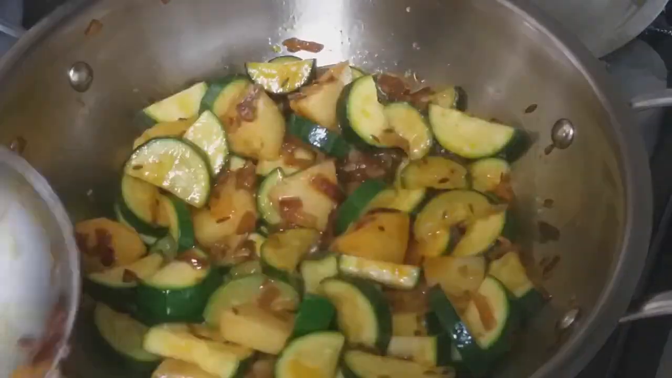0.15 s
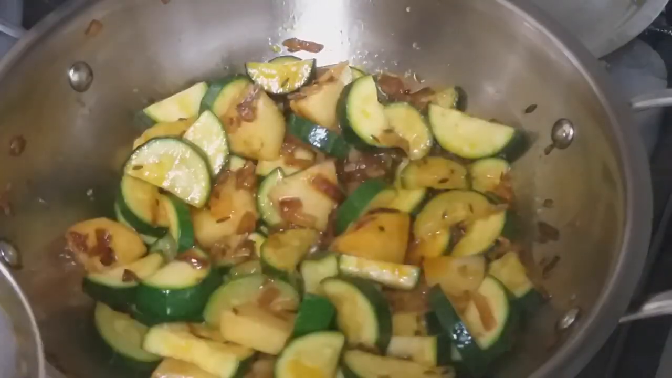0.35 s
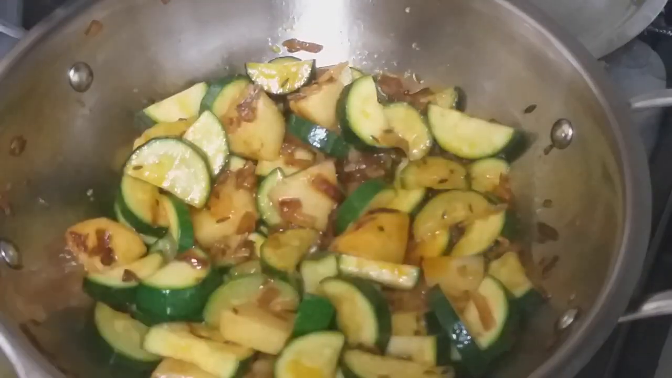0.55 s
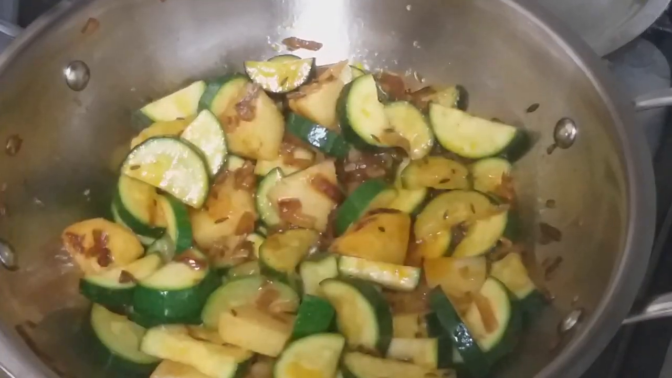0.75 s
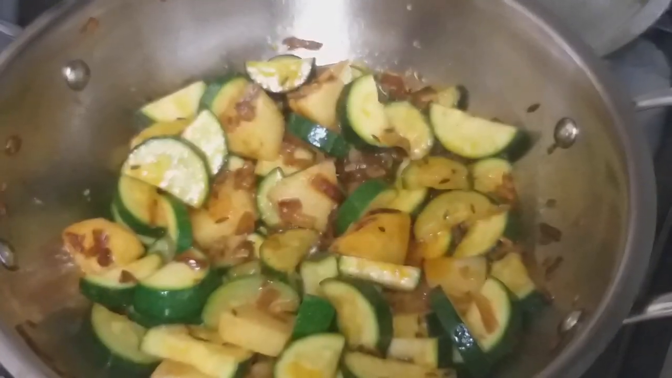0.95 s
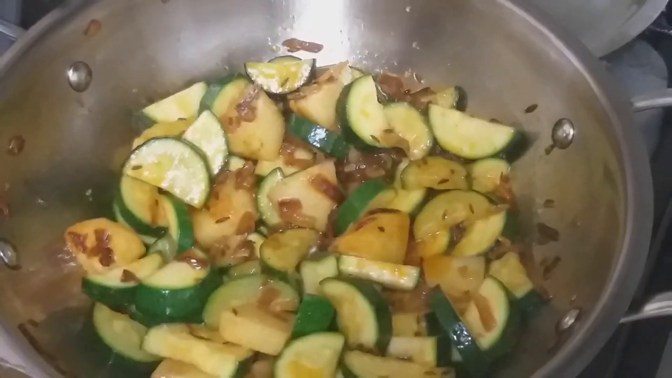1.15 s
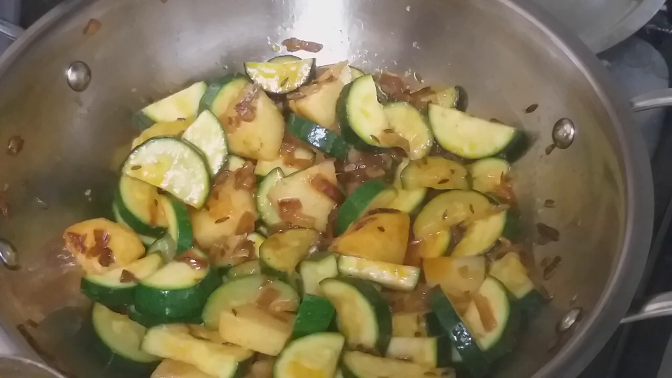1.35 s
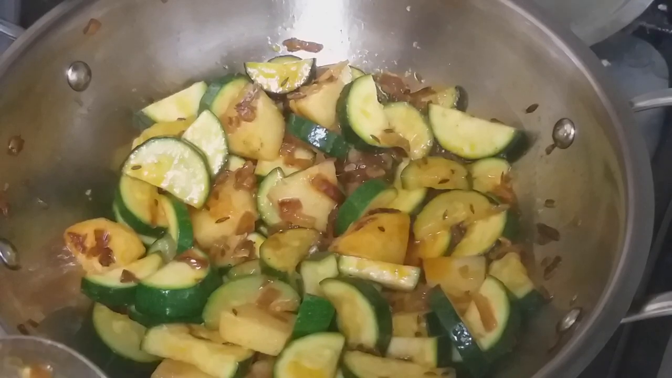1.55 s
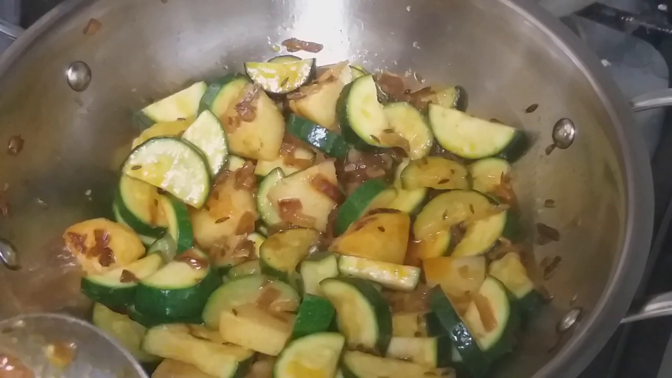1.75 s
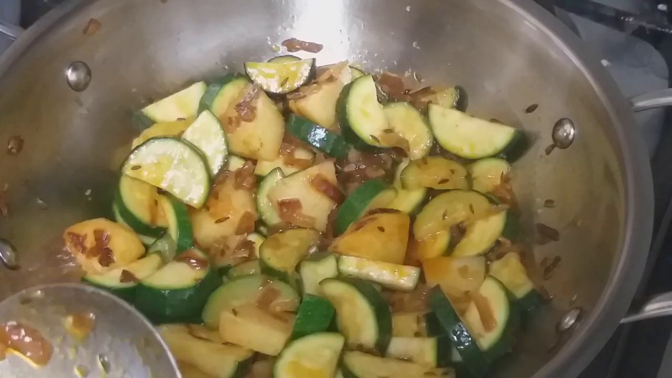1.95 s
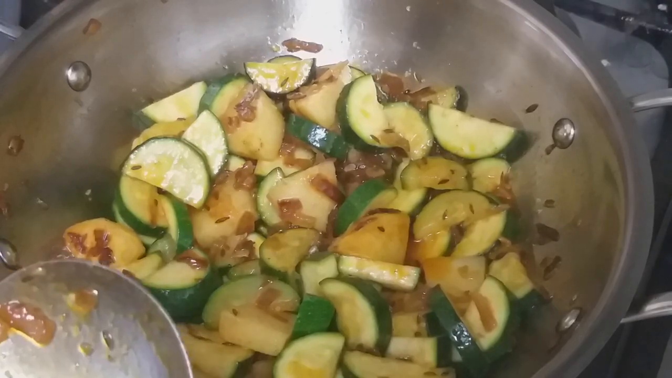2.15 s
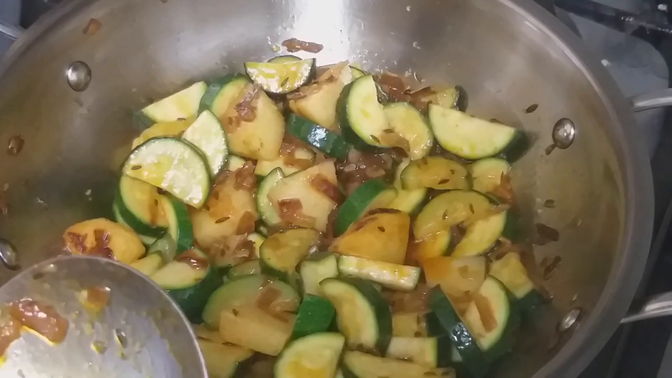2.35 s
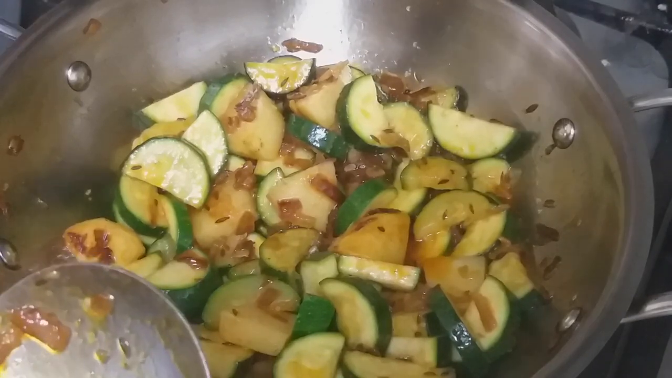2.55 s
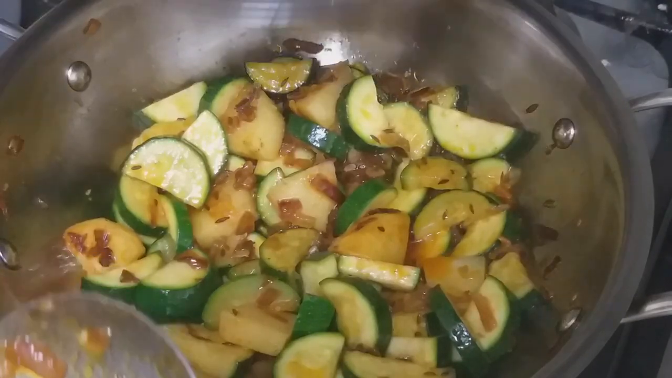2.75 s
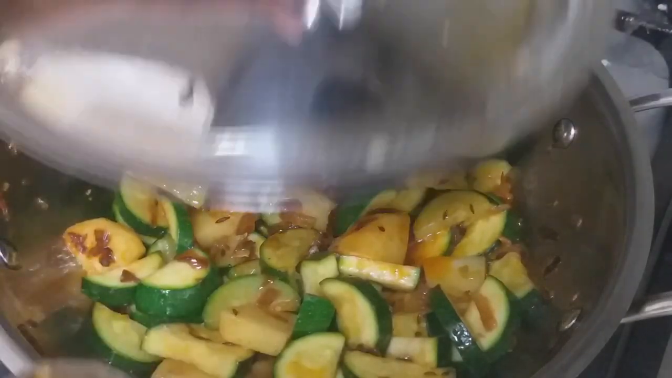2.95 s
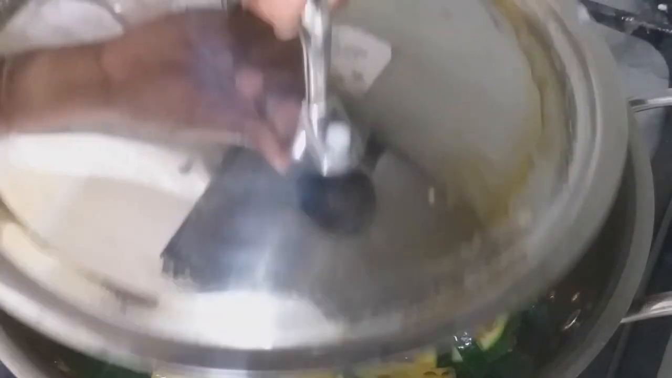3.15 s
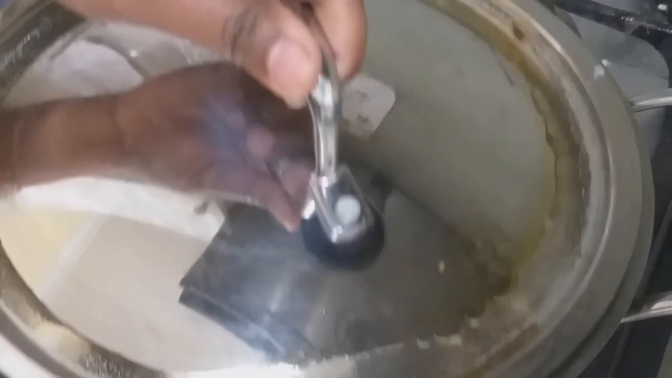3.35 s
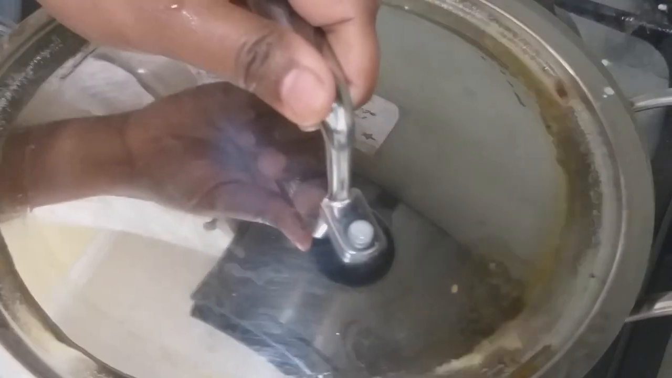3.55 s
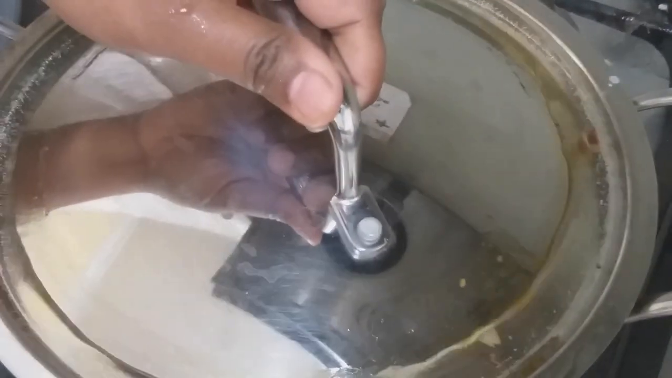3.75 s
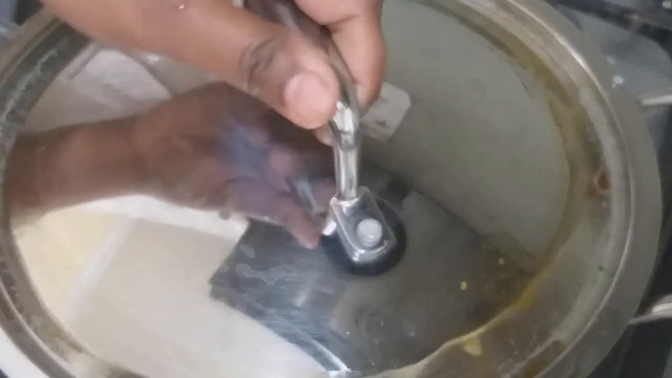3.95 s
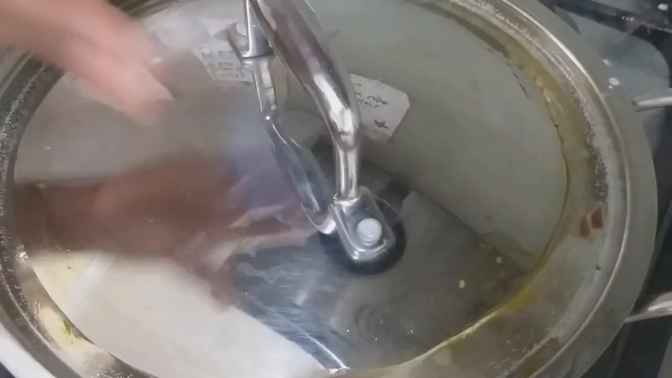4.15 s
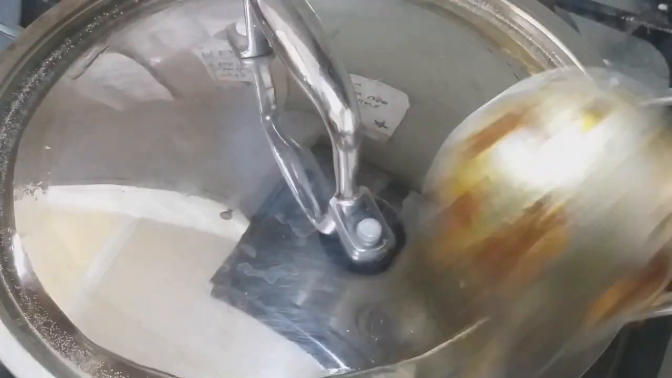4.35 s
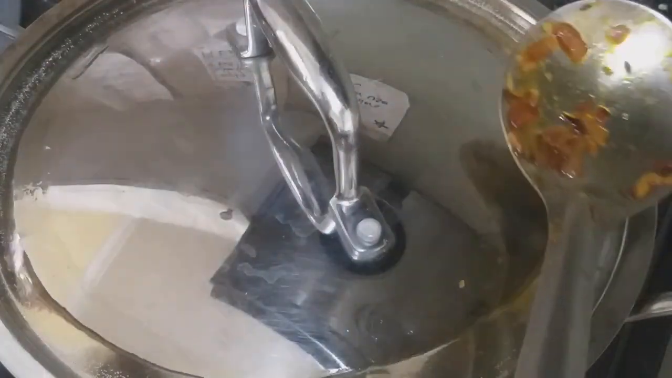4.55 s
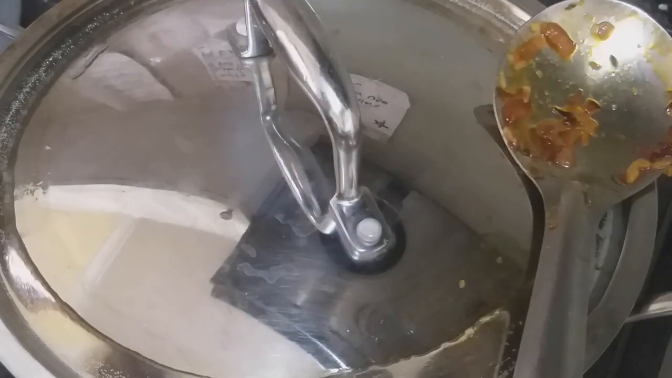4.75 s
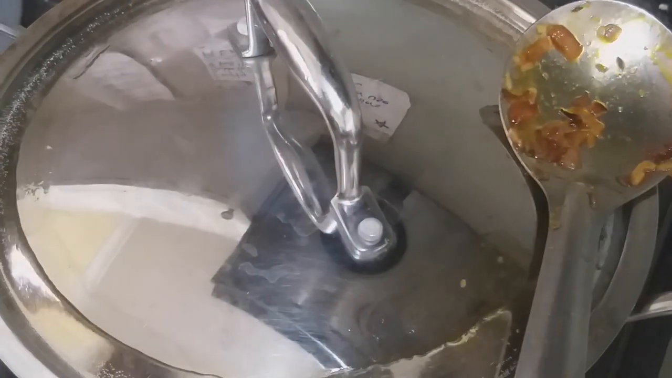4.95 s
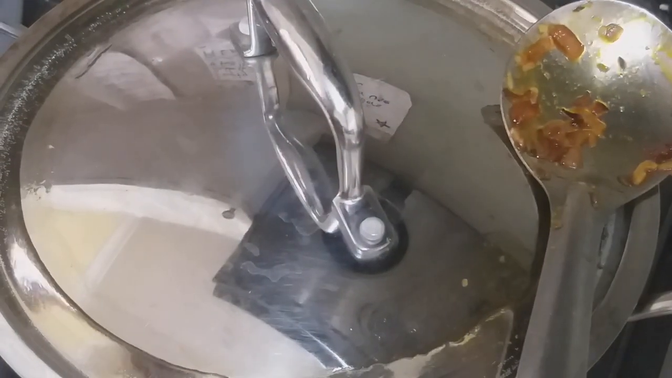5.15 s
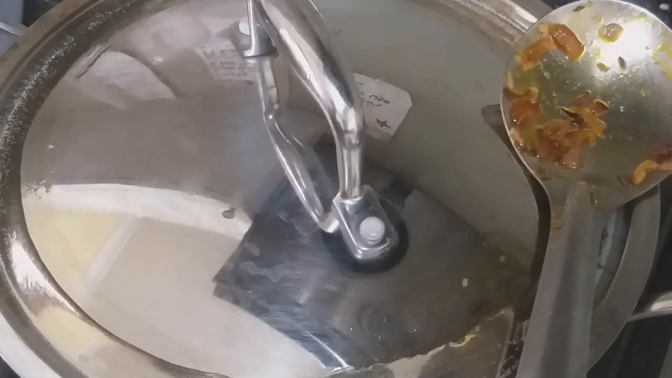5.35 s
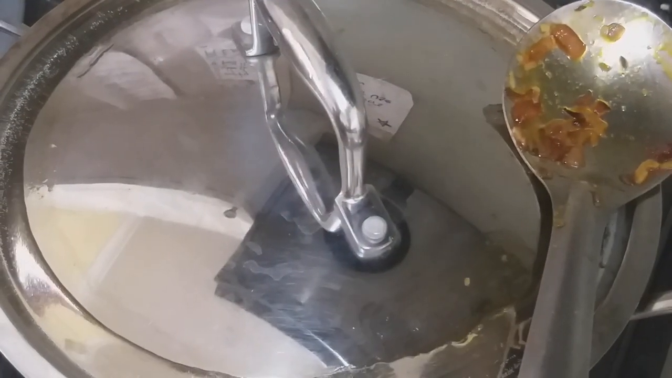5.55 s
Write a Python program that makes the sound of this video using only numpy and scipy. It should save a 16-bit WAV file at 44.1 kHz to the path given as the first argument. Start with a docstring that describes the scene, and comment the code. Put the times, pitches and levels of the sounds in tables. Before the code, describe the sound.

Close in a small kitchen, vegetables fry with a steady bright sizzle and random sharp spits over a faint low gas flame. A steel lid comes down, dulling the sizzle with a brief hollow ringing, then knocks and grinds onto the rim. Only very faint muffled frying remains until a ladle clacks and bounces on the lid. Near-mono close microphone, short room echo.

```python
"""Frying under a lid

Vegetable pieces sizzle and spit in oil in a steel pan over a gas ring, close by in a small kitchen: random short rings.
A lid comes down: the sizzle dulls, the air under the lid rings in narrow bands, then only muffled noise is left.
The lid knocks and grinds on the rim, and a steel ladle drops on it and bounces: forces drive banks of steel modes.
The flame roars low and the burner hums, both filtered noise; a soft noise hiss swells near the end."""
import sys
import numpy as np
from scipy import signal
from scipy.fft import rfft, irfft
from scipy.io import wavfile

SR = 44100
rng = np.random.default_rng(int(sys.argv[2]) if len(sys.argv) > 2 else 0)


def digitize_waveform(pressure):
    """Quantize a signal to 16-bit integers and store it at the path in sys.argv[1].

    Rows of a 2-D input are taken as channels; values are limited to [-1, 1].
    """
    field = np.atleast_2d(pressure).T
    bounded = np.clip(field, -1, 1)
    quanta = np.round(bounded * 32767).astype(np.int16)
    wavfile.write(sys.argv[1], SR, quanta)


N = 251193
TIME_S = np.arange(N) / SR

# The lid comes down, ending at the rim. Each row: time in seconds, share of the pan covered from 0 to 1.
COVER = [(2.75, 0), (2.95, 0.04), (3.15, 0.24), (3.36, 0.5), (3.411, 0.8)]


def from_db(db):
    """Decibels to gain."""
    return 10 ** (np.asarray(db) / 20)


def rms_one(x):
    """Scale to rms 1."""
    return x / np.sqrt(np.mean(x ** 2) + 1e-20)


def in_time(rows, outside=None):
    """Columns of a table as curves, one value a sample; the first column is time in seconds."""
    s, *columns = np.transpose(rows)
    return [np.interp(TIME_S, s, column, outside, outside) for column in columns]


def at_hz(points, hz):
    """Read a curve of (Hz, value) points on a log-frequency axis."""
    point_hz, values = np.transpose(points)
    return np.interp(np.log(np.maximum(hz, 1)), np.log(point_hz), values)


def colour(x, spectrum):
    """Causal (minimum-phase) filter of the given dB shape, made by folding the cepstrum."""
    size = 8192
    bins_hz = np.arange(size // 2 + 1) * SR / size
    cepstrum = irfft(np.log(from_db(at_hz(spectrum, bins_hz))))
    cepstrum[1:size // 2] *= 2
    cepstrum[size // 2 + 1:] = 0
    impulse = irfft(np.exp(rfft(cepstrum)))
    return signal.fftconvolve(x, impulse)[:len(x)]


def butter(x, order, hz, kind="low"):
    """Butterworth filter."""
    return signal.sosfilt(signal.butter(order, hz, kind, fs=SR, output="sos"), x)


def drift(rate_hz):
    """Slow random curve of rms 1: noise through two equal low-pass poles, made at a fortieth of the rate."""
    r = np.exp(-2 * np.pi * rate_hz * 40 / SR)
    slow = signal.lfilter([1], [1, -2 * r, r * r], rng.standard_normal(N // 40 + 2002))
    slow = slow[2000:]   # leave out the filter's start
    return np.interp(np.arange(N) / 40, np.arange(len(slow)), rms_one(slow))


def ring(force, hz, t60):
    """Two-pole resonance: a unit click sets a sine of height 1 ringing, 60 dB down after t60 seconds."""
    r = from_db(-60 / (t60 * SR))
    w = 2 * np.pi * hz / SR
    return signal.lfilter([0, np.sin(w)], [1, -2 * r * np.cos(w), r * r], force + 1e-18)


def width_to_t60(width_hz):
    """Decay time in seconds of a resonance of this bandwidth."""
    return np.log(1000) / (np.pi * width_hz)


def air_modes(x, modes):
    """Parallel resonances fed by a steady sound; rms 1."""
    return rms_one(sum(from_db(db) * rms_one(ring(x, hz, width_to_t60(width_hz)))
                       for hz, width_hz, db in modes))


def frying():
    """One sizzle, heard directly, in the shrinking gap under the lid, then through the lid."""
    fizz = bursting(per_s=20000, spread_db=2.0, cycles=5.5, patchy_db=1.0)
    pops = spits()
    return direct_sizzle(fizz) + pops + lid_gap(fizz, pops) + through_lid(fizz)


def bursting(per_s, spread_db, cycles, patchy_db):
    """Steam bubbles burst at random, each ringing a few cycles; the pitches come and go in patches."""
    sizes = from_db(spread_db * np.minimum(rng.exponential(1, N), 7)) * rng.choice([-1, 1], N)
    bursts = sizes * (rng.random(N) < per_s / SR)
    pitches = np.geomspace(600, 15000, 16)
    dealt = rng.integers(0, 16, N)   # each burst gets one of the pitches
    together = drift(9)
    fizz = 0
    for k, hz in enumerate(pitches):
        patches = from_db(patchy_db * (0.5 * together + drift(23)))
        rings = rms_one(ring(bursts * (dealt == k), hz, cycles / hz))
        fizz = fizz + np.sqrt(hz) * patches * rings   # the weight keeps the spectrum about flat
    return rms_one(fizz)


def covered():
    """Share of the pan under the lid, and whether the lid is still off the rim."""
    return in_time(COVER)[0], TIME_S < COVER[-1][0]


def direct_sizzle(fizz):
    """The lowering lid shades the sizzle, the lower pitches by their own amount."""
    # Colour of the open sizzle. Each row: frequency in Hz, relative level in dB.
    sizzle_colour = [(240, -81), (400, -22.5), (459, -16), (552, -24.5), (706, -16), (836, -19.5),
                     (975, -6), (1270, -10.5), (1500, -6), (2370, -7), (4260, 0), (7750, -2), (9030, -3.5),
                     (12100, -2), (15700, -5)]
    split_hz, low_boost_db = 3500, 2.5
    low_shade_db, high_shade_db = 25.5, 15   # loss per unit of cover
    level_db, fade_db_per_s = -38.5, 0.5
    cover, ajar = covered()
    sizzle = rms_one(colour(fizz, sizzle_colour))
    low = from_db(low_boost_db - low_shade_db * cover) * butter(sizzle, 2, split_hz)
    high = from_db(-high_shade_db * cover) * butter(sizzle, 2, split_hz, "high")
    # subtracting lets the two bands add up where they cross
    return ajar * from_db(level_db - fade_db_per_s * TIME_S) * (low - high)


def spits():
    """Drops of water flash to steam: a pop that swells and dies within a few cycles, thrown back by the pan walls."""
    # Loud spits of oil. Each row: start in seconds, level in dB, pitch in Hz.
    loud_spits = [(0.154, -24, 12400), (0.24, -20, 12500), (0.4428, -15.5, 5170), (0.5164, -21, 5330),
                  (0.5834, -28, 4200), (0.6843, -20, 14700), (0.6938, -20, 15050), (0.816, -24.5, 4400),
                  (1.0111, -24.5, 12800), (1.0111, -29, 2850), (1.1056, -23.5, 4500), (1.371, -26, 4500),
                  (1.7995, -20.5, 4500), (1.924, -21, 12700), (2.2754, -20, 13400), (2.4022, -18, 3444),
                  (2.6572, -20.5, 5140), (2.804, -26.5, 3920), (2.8575, -22, 4460), (2.9790, -21, 4900),
                  (3.197, -38.5, 2240), (3.277, -23, 7950), (3.283, -38, 2160)]
    small_per_s, small_floor_db, small_spread_db = 12, -35, 3.5
    small_low_hz, small_high_hz = 3500, 14000
    cycles_to_peak = 0.72
    echo_ms, echo_db = 5.4, 1
    when, pitch, size = rng.random((200, 3)).T
    starts = np.cumsum(-np.log(1 - when)) / small_per_s
    levels_db = small_floor_db - small_spread_db * np.log(1 - size)
    pitches = small_low_hz * (small_high_hz / small_low_hz) ** pitch
    # the small spits stop while the lid is coming down
    small = [row for row in zip(starts, levels_db, pitches) if row[0] < COVER[2][0]]
    pops = np.zeros(N + 800)
    for s, level_db, hz in loud_spits + small:
        at = round(s * SR)
        turns = np.arange(800) * hz / SR
        swell = turns / cycles_to_peak
        pops[at:at + 800] += from_db(level_db) * np.sin(2 * np.pi * turns) * swell * np.exp(1 - swell)
    walls = rng.standard_normal(800) * np.exp(-1000 * np.arange(800) / SR / echo_ms)
    walls /= np.sqrt(np.sum(walls ** 2))
    return pops[:N] + from_db(echo_db) * signal.fftconvolve(pops, walls)[:N]


def lid_gap(fizz, pops):
    """The air under the lid rings: one band sinks in pitch as the lid travels, others stay fixed."""
    # Fixed resonances of the gap. Each row: pitch in Hz, width in Hz, relative level in dB.
    gap_modes = [(1315, 36, -2.5), (2065, 71, 1), (2663, 63, -15.5), (3214, 140, -4), (3840, 120, -12),
                 (4500, 170, -10.5), (5080, 150, -15.5)]
    open_hz, shut_hz, sinking_width_hz = 840, 464, 78
    sinking_db, fixed_db, full_at_cover = -61.5, -54, 0.23
    spit_db = -20
    cover, ajar = covered()
    sinking_hz, = in_time([(COVER[0][0], open_hz), (COVER[-1][0], shut_hz)])
    # narrow noise: a slow random envelope pair carried on the moving pitch
    turn = 2 * np.pi * np.cumsum(sinking_hz) / SR
    sinking = drift(sinking_width_hz) * np.cos(turn) + drift(sinking_width_hz) * np.sin(turn)
    fixed = from_db(fixed_db + 3.2 * drift(23)) * air_modes(fizz, gap_modes)
    steady = ajar * np.clip(cover / full_at_cover, 0, 1) * (from_db(sinking_db) * sinking + fixed)
    # spits under the lowering lid ring the fixed resonances
    rung = sum(from_db(spit_db + db) * ring(pops, hz, width_to_t60(width_hz))
               for hz, width_hz, db in gap_modes)
    return steady + cover * rung


def through_lid(fizz):
    """Muffled sizzle through the lid; it grows with the cover and eases off once the lid meets the rim."""
    # Colour of the muffled sizzle. Each row: frequency in Hz, relative level in dB.
    muffled = [(300, -30), (470, -6), (1400, -14), (1950, -12), (2600, -24), (3650, -9), (4200, -19),
               (5250, -20), (5500, -7), (5900, -2), (6400, -11), (10200, -4), (12900, -11), (13200, -21),
               (15700, -31)]
    # Resonances of the shut pan. Each row: pitch in Hz, width in Hz, relative level in dB.
    shut_modes = [(1150, 45, -1), (1880, 60, -2), (7700, 200, -2), (8870, 120, 0)]
    level_db, leak_db, seating_s = -60.5, 8.5, 0.3   # the leak is extra level that dies as the lid seats
    smooth = rng.standard_normal(N) + 0.17 * fizz   # the lid and the trapped air smear the bursts
    through = rms_one(colour(smooth, muffled)) + from_db(-19.0) * air_modes(smooth, shut_modes)
    since_shut = np.maximum(TIME_S - COVER[-1][0], 0)
    leak = leak_db * np.exp(-since_shut / seating_s)
    return covered()[0] * from_db(level_db + leak) * through


def steel():
    """Lid, ladle and pan: knocks, grinding and bounces drive all the steel bodies."""
    # Lid on rim, landing with bounces, then dropping into its seat. Each row: start in seconds,
    # rattle decay in ms, then the relative levels in dB of lid ring, thud and crack.
    knocks = [(3.415, 4.8, -21.5, -23.5, -8), (3.4217, 5.3, -23.5, -34.5, -11.5),
              (3.434, 5.5, -22.5, -27, -23), (3.455, 10, -38.5, -27, -28), (3.489, 20, -33, -34, -24.5),
              (3.52, 22, -43, -38, -31), (3.697, 3.6, -40, -19, -24), (3.707, 3.8, -24.5, -35, -33),
              (3.726, 10, -35, -36, -47), (3.748, 10, -36.5, -27.5, -45)]
    # Ladle on lid, a drop and its bounces. Each row: start in seconds, rattle decay in ms,
    # then the relative levels in dB of lid ring, thud, crack, chink and ladle ring.
    drops = [(4.6122, 7.7, -33, -26, -9, -21.5, -21.5), (4.6981, 13, -35.5, -51, -23, -41.5, -33),
             (4.7120, 7.2, -28, -19.5, -12, -17, -30), (4.8128, 8.1, -59, -30.5, -28.5, -34, -47)]
    # Lid grinding into its seat. Each row: time in seconds, relative rub and thud levels in dB.
    grind = [(3.57, -48, -47.5), (3.618, -32.5, -60), (3.634, -26, -54), (3.668, -29, -43.5),
             (3.696, -26.5, -23.5), (3.714, -26, -34), (3.79, -57, -36)]
    lid_chink_db = -15.5   # chink against crack
    knocks = [(*row, row[-1] + lid_chink_db) for row in knocks]
    on_lid, on_pan, crack, on_thick, on_ladle = blows(knocks + drops)
    rub_db, thud_db = in_time(grind, -120)
    grit = rng.standard_normal((4, N)) * from_db(1.3 * drift(76))   # rubbing steel catches unevenly
    rub = butter(grit[0], 2, 2300)   # a sliding contact is soft and barely drives the top modes
    metal = lid_ring(on_lid + from_db(rub_db - 26) * rub)
    metal += ladle_ring(on_ladle)
    metal += thick_chink(on_thick + from_db(rub_db - 39) * grit[1])
    metal += pan_thud(on_pan + from_db(thud_db - 27.0) * grit[2])
    metal += contact_crack(crack + from_db(rub_db - 22.0) * grit[3])
    return butter(metal, 4, 85, "high")   # small bodies radiate no deep bass


def blows(table):
    """Each blow is a first sharp contact and a dying rattle; returns forces on lid, thud, crack, chink and ladle."""
    first_touch = 1.6 * np.array([2, 4, 1, 1, 2])   # against the rattle after it
    t_ms = 1000 * np.arange(4000) / SR
    forces = np.zeros((5, N))
    for s, decay_ms, *levels_db in table:
        at, count = round(s * SR), len(levels_db)
        rattle = rng.standard_normal((count, 4000)) * np.exp(-t_ms / decay_ms)
        rattle[:, 0] = first_touch[:count]
        rattle /= np.sqrt((rattle ** 2).sum(axis=1, keepdims=True))
        forces[:count, at:at + 4000] += from_db(levels_db)[:, None] * rattle
    return forces


def struck(force, modes):
    """A force into all modes of a steel body; on a not quite round body each mode splits in three."""
    split = 0.006   # relative spread of near-twin modes
    out = 0
    for k, (hz, db, t60) in enumerate(modes):
        height = (-1) ** k * from_db(db - 10.0)   # neighbouring modes move in opposite phase
        for side in (-1, 0, 0.7):
            out = out + height * ring(force, hz * (1 + split * side), t60)
    return out


def thin_shell(pitches_hz, levels_db, t60_at_1khz, loss):
    """Mode rows of a shell whose higher modes die sooner."""
    return [(hz, db, t60_at_1khz * (hz / 1000) ** -loss) for hz, db in zip(pitches_hz, levels_db)]


def lid_ring(force):
    """The thin lid rings briefly, its high modes dying much sooner."""
    # Modes of the lid: pitches in Hz, then their relative levels in dB.
    pitches_hz = [615, 969, 1030, 1113, 1200, 1262, 1335, 1451, 1517, 1625, 1737, 1816, 1860, 1950, 2036,
                  2245, 2360, 2660, 2850, 3000, 3315, 3492, 3708, 4250, 4570, 5150]
    levels_db = [-20, -4, -8, -7, -7, -6, -8, -10, 1, -4, -1, 3.5, -0.5, -10.5, -13, -12.5, -16.5, -9, -14,
                 -18, -9.5, 2, -1, -4, -14.5, -8]
    return struck(force, thin_shell(pitches_hz, levels_db, 0.078, loss=0.5))


def ladle_ring(force):
    """The ladle bowl rings longer than the lid."""
    # Modes of the ladle bowl: pitches in Hz, then their relative levels in dB.
    pitches_hz = [525, 660, 790, 965, 1130, 1290, 1452, 1533, 1618, 1720, 1865, 2040, 2250, 2520, 2800,
                  3228, 3340, 3476, 3730, 4200, 4610]
    levels_db = [-3, -15, -14, -3, -11, -17.5, -1, 0, 0, -8.5, -1, 0.5, -11, -15, -18.5, 2, -1, -10.5, -19,
                 -13, -9]
    return struck(force, thin_shell(pitches_hz, levels_db, 0.14, loss=0.12))


def thick_chink(force):
    """The thick steel parts give a short, high chink."""
    # Modes of the thick parts: pitches in Hz, then their relative levels in dB.
    pitches_hz = [5910, 6420, 7000, 7500, 7960, 8980, 9650, 10200, 10650, 11050, 11450, 11800, 12100, 12400,
                  12900, 13400, 13800, 14800, 15200]
    levels_db = [-14, -17, -22, -10.5, -7.5, -10, -6.5, 0, -10.5, -2.5, -10, 2, -7.5, -6.5, -5.5, -3, -6,
                 -8.5, -9.5]
    return struck(force, thin_shell(pitches_hz, levels_db, 0.031, loss=0.18))


def pan_thud(force):
    """The pan body answers with a low thud of a few deep modes."""
    # Modes of the pan body. Each row: pitch in Hz, relative level in dB, nominal 60 dB decay in seconds.
    pan_body = [(111, -10.5, 0.087), (180, -12.5, 0.045), (256, -7, .1), (314, -1.5, 0.084),
                (372, -6.5, 0.096), (468, -4.5, 0.052)]
    return struck(force, pan_body)


def contact_crack(force):
    """The contact noise itself, filtered but with no modes of its own."""
    # Colour of the crack. Each row: frequency in Hz, relative level in dB.
    crack_colour = [(59, -16.5), (100, -17), (341, -6), (829, -6), (942, -7), (1500, 1.5), (2830, -13),
                    (3420, -1), (3970, -7.5), (12200, -22), (15700, -29)]
    return from_db(26.5) * colour(force, crack_colour)


def gas_ring():
    """Low roar of the flame and a wavering hum of the air in the burner."""
    # Colour of the roar. Each row: frequency in Hz, relative level in dB.
    roar_colour = [(13, -66.5), (22, -40.5), (76, -1), (137, -1), (176, -14.5), (268, -10.5), (299, -5.5),
                   (389, -13.5), (408, -17), (441, -23), (900, -30.5), (1170, -62), (1980, -120)]
    # Course of the hum. Each row: time in seconds, mean level in dB.
    hum_course = [(0, -71), (.5, -63.5), (1.2, -62), (2.0, -62.5), (2.7, -64), (3.15, -66.5), (4.1, -67),
                  (4.46, -74.5), (4.58, -56.5), (5.05, -73.5), (5.46, -61), (5.59, -59.5), (5.66, -84)]
    hum_hz, hum_width_hz, hum_waver_db = 305.7, 12.6, 2
    roar = from_db(-68.5 + 1.51 * drift(8.2)) * rms_one(colour(rng.standard_normal(N), roar_colour))
    hum = air_modes(rng.standard_normal(N), [(hum_hz, hum_width_hz, 0)])
    return roar + from_db(in_time(hum_course)[0] + hum_waver_db * drift(3.2)) * hum


def hiss():
    """A soft hiss swells: smooth mid-band noise."""
    # Swell of the hiss. Each row: time in seconds, level in dB.
    swell = [(5.4, -95), (5.52, -66.5), (5.6, -66), (5.65, -57), (5.7, -59)]
    # Colour of the hiss. Each row: frequency in Hz, relative level in dB.
    hiss_colour = [(530, -46), (900, -22), (1250, -11), (1310, -29.5), (1440, -10.5), (1870, -5.5),
                   (6000, -10.5), (7800, -38), (13200, -120)]
    return from_db(in_time(swell, -120)[0]) * rms_one(colour(rng.standard_normal(N), hiss_colour))


def kitchen(x):
    """Dense echoes: noise that dies band by band."""
    # Decay of the room. Each row: frequency in Hz, 60 dB decay time in seconds.
    decay = [(100, 0.67), (400, 0.42), (1500, 0.53), (4000, 0.45), (14000, 0.19)]
    t = np.arange(SR) / SR
    edges_hz = 60 * 2. ** np.arange(9)   # octaves
    tail = 0
    for low, high in zip(edges_hz, edges_hz[1:]):
        band = butter(rng.standard_normal(SR), 2, [low, high], "band")
        tail = tail + band * from_db(-60 * t / at_hz(decay, np.sqrt(low * high)))
    tail *= np.clip(t / 0.0027, 0, 1)   # the first walls answer after some metres
    return signal.fftconvolve(x, tail / np.sqrt(np.sum(tail ** 2)))[:N]


def scene():
    """All sources lie in front of one point; the kitchen answers the steel alone."""
    metal = steel()
    mono = frying() + metal + gas_ring() + hiss() + from_db(-9.5) * kitchen(metal)
    return np.array([mono, mono])


def record(dry):
    """Two close ports hear alike but for two casing resonances; the top is cut."""
    # Casing resonances. Each row: lower edge in Hz, upper edge in Hz, share added left and taken off right.
    ports = [(1620, 2070, 0.19), (9600, 10300, -.24)]
    unlike = 0
    for low_hz, high_hz, share in ports:
        unlike = unlike + share * butter(dry, 2, [low_hz, high_hz], "band")
    heard = dry + unlike * [[1], [-1]]
    return signal.sosfilt(signal.cheby2(30, 70, 15900, fs=SR, output="sos"), heard)   # steep cut at 15.9 kHz


dry = scene()
out = record(dry)
digitize_waveform(out)
```